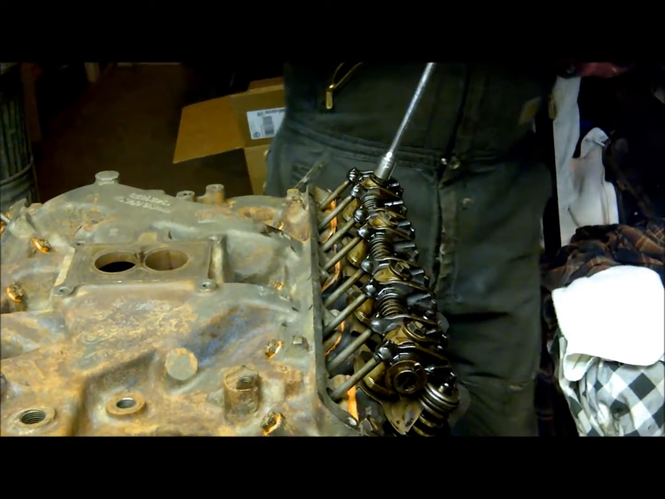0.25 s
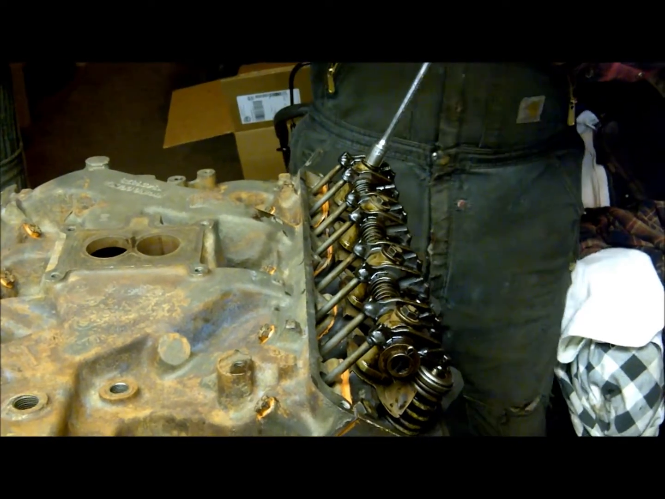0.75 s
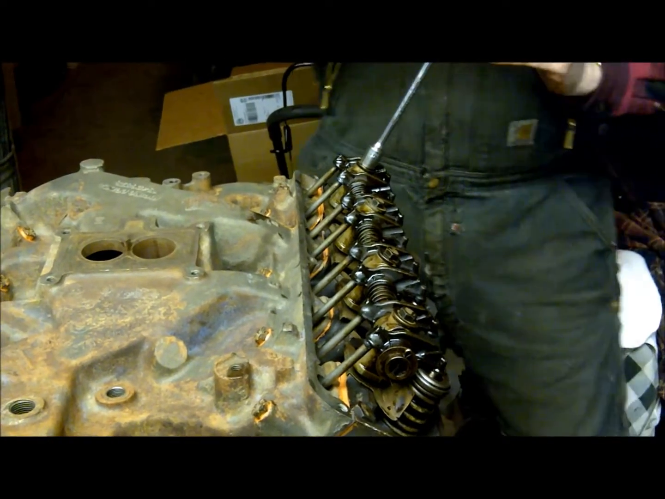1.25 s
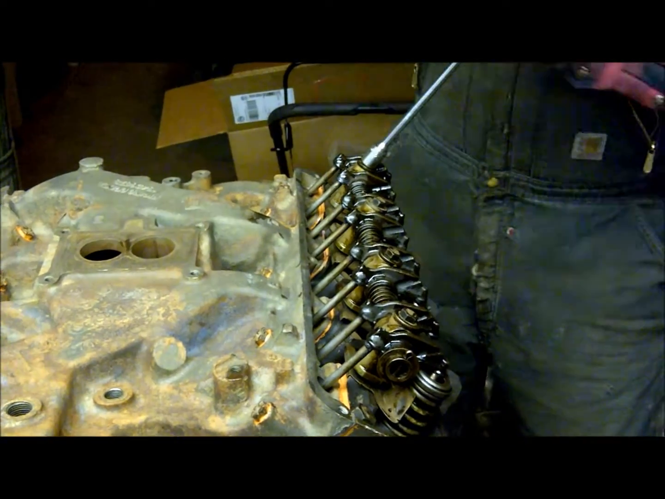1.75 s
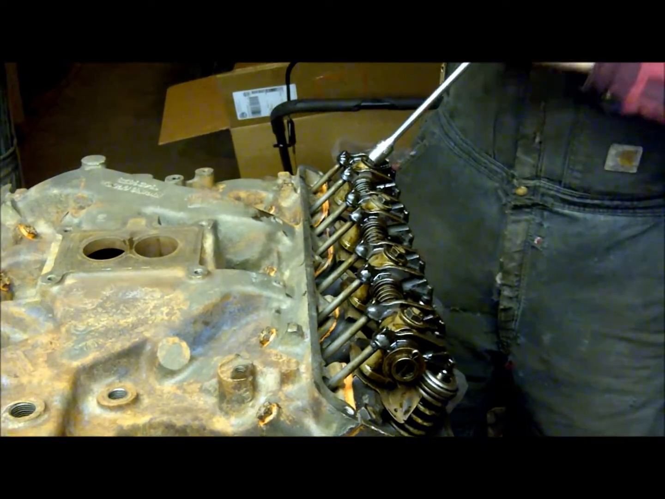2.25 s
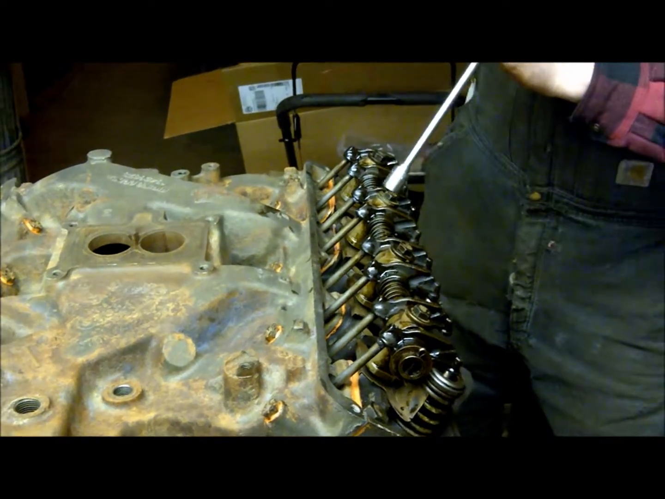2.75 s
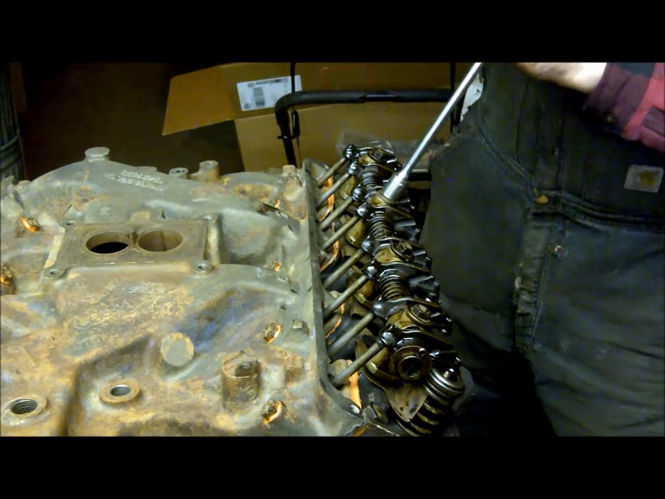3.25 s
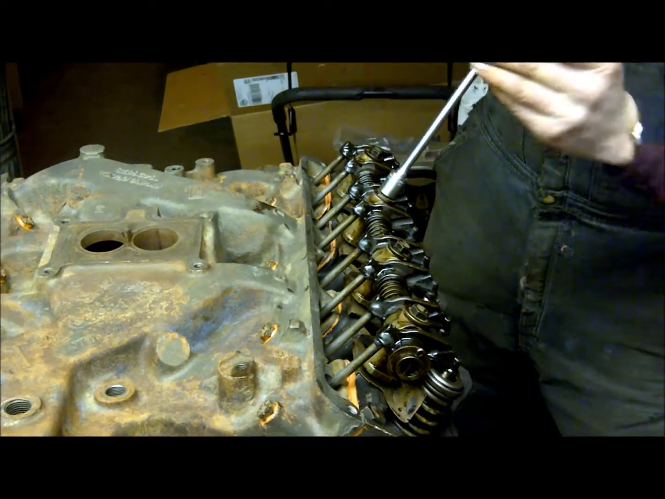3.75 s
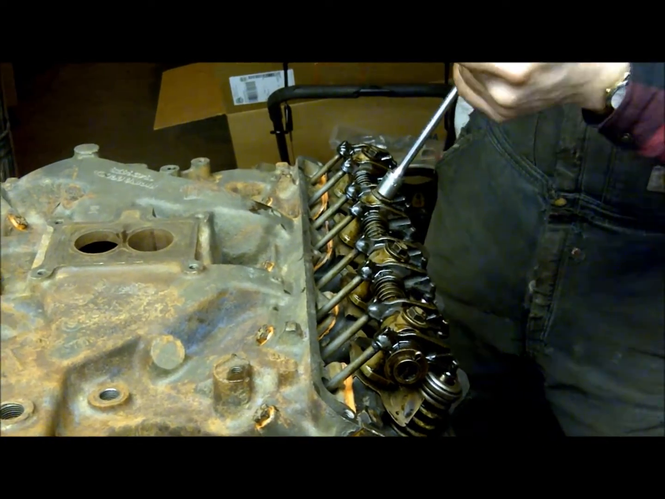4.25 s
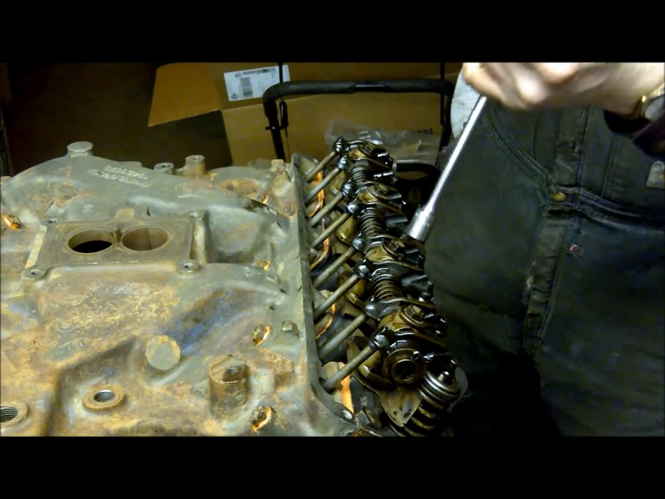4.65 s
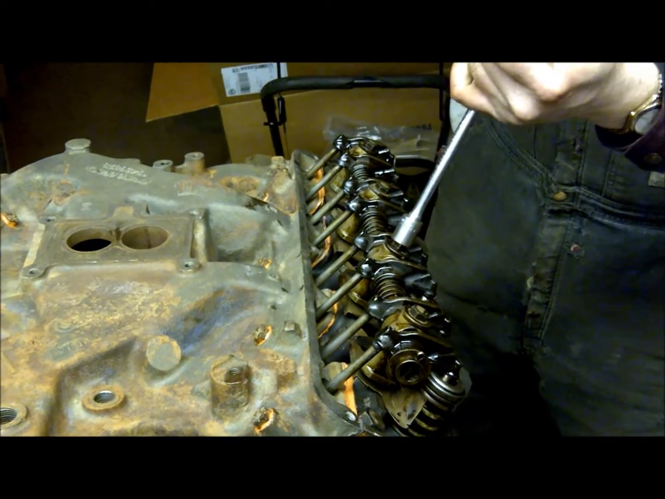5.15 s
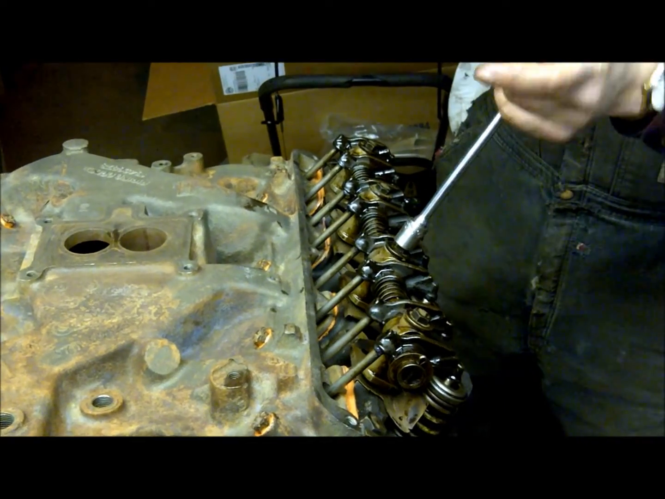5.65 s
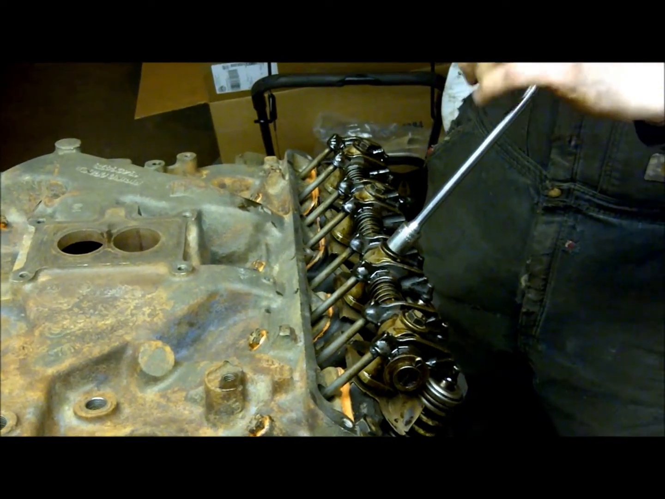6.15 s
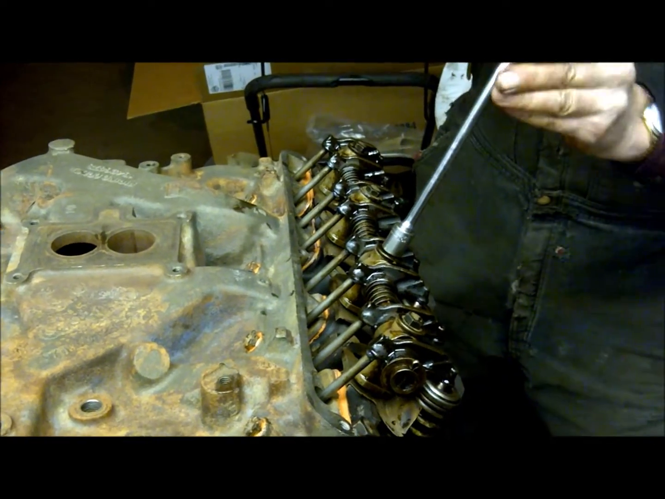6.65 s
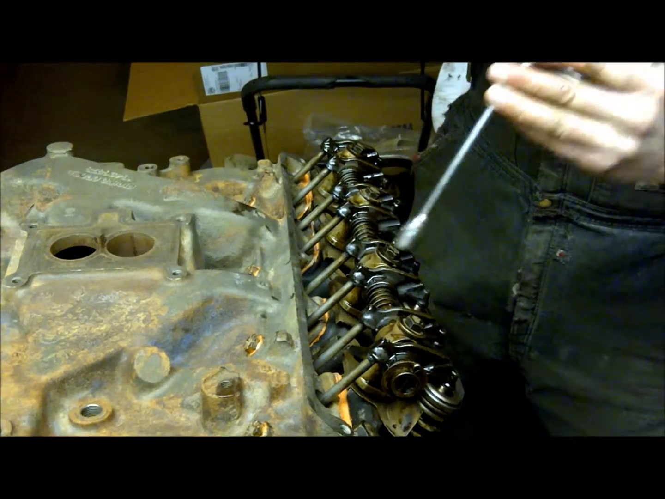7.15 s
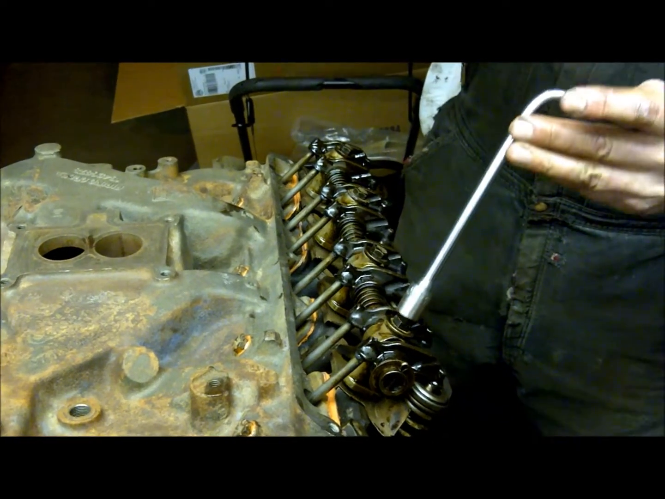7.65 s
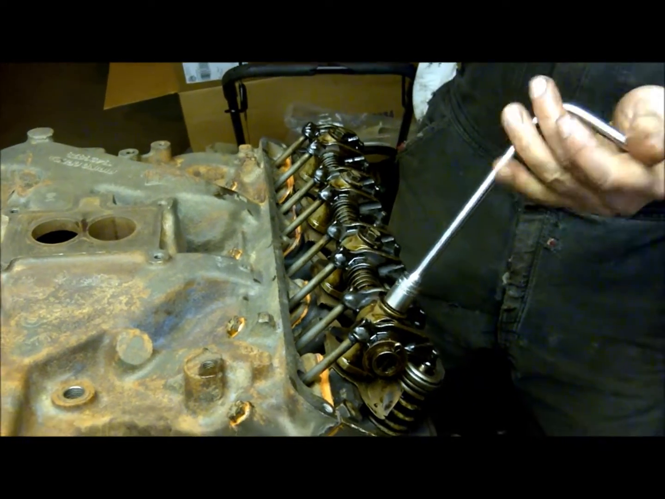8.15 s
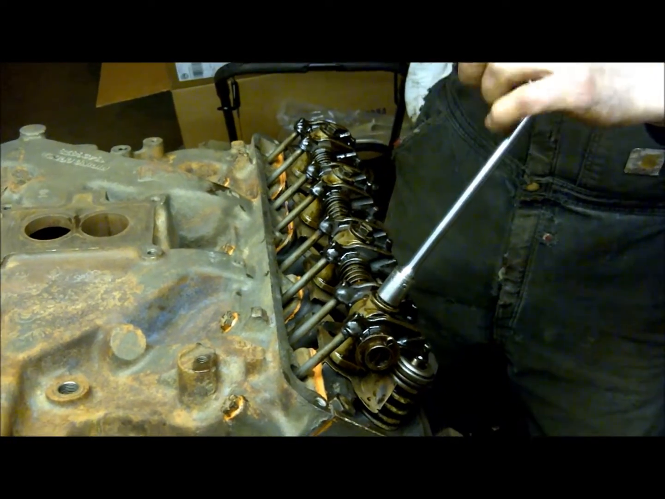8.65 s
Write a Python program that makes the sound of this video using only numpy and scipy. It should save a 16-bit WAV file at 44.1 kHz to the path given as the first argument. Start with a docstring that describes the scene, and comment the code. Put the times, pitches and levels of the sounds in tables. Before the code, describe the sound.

In a small, reflective garage, a steady low electrical hum with wavering fan tones and a soft rush of air runs throughout. A metal socket clicks lightly on engine bolts at once, with heavy canvas overalls swishing and dull body knocks. Sparser clinks follow, with faint hand-slides along the shaft. A sharp loud clank lands around the middle, then light ticks continue. Close microphone, slightly hissy.

```python
"""A long socket wrench turns one engine bolt after another in a small garage.
Mains hum, fan tones and a soft rush of air run underneath from start to end.
Small clicks of the steel socket start at once, with canvas overalls swishing and a few dull knocks.
Then come scattered clinks, fewer swishes and faint hisses of a hand sliding along the wrench's shaft;
the loudest clank is at 6 s. Steel rings as damped modes in noise, rubbing is grains, the room reflects."""
import sys
import numpy as np
from scipy import signal
from scipy.fft import rfft, irfft, next_fast_len
from scipy.io import wavfile

SR = 44100
rng = np.random.default_rng(int(sys.argv[2]) if len(sys.argv) > 2 else 0)


def pcm_store(signal):
    """Save signal as 16-bit PCM."""
    levels = np.round(np.clip(np.atleast_2d(signal), -1, 1) * 32767)
    wavfile.write(sys.argv[1], SR, levels.astype(np.int16).T)


N = 392469
TIME = np.arange(N) / SR  # s

# rise and fall of the fan's whine, which its rush follows a little; only the shape about
# the mean counts: (t/s, level/dB)
FAN_SWELL = [(0, -64.5), (1.4, -61.5), (2.7, -66), (3, -59), (4.9, -68), (5.4, -69), (6.55, -60.5),
             (6.9, -65.5), (8, -66.5), (8.9, -69)]


def gain_of(db):
    """Turns decibels into an amplitude factor."""
    return 10 ** (np.asarray(db) / 20)


def evened(x):
    """Scales a sound to rms 1."""
    return x / np.sqrt(np.mean(x ** 2) + 1e-20)


def read(points, hz):
    """Reads a table between its points, along a log-frequency axis."""
    f, value = np.transpose(points)
    return np.interp(np.log(hz + 1), np.log(f + 1), value)


def add(mix, s, sound):
    """Mixes a sound in, starting at s seconds."""
    part = mix[max(round(s * SR), 0):][:len(sound)]
    part += sound[:len(part)]


def coloured(x, points, size=4096):
    """Filters with a (f/Hz, level/dB) spectrum; the minimum-phase filter never sounds ahead of its input."""
    hz = abs(np.fft.fftfreq(size, 1 / SR))
    log_gain = np.log(gain_of(read(points, hz)))
    spectrum = np.exp(np.conj(signal.hilbert(log_gain)))
    taps = np.fft.ifft(spectrum).real[:size // 2]
    return signal.oaconvolve(x, taps)[:len(x)]


def band_db(x, lo, hi):
    """Finds the mean power between two frequencies, in dB."""
    hz = np.fft.rfftfreq(len(x), 1 / SR)
    in_band = (hz >= lo) & (hz < hi)
    return 10 * np.log10(2 * np.sum(abs(rfft(x)[in_band]) ** 2) / len(x) ** 2 + 1e-20)


def narrow_noise(hz, width):
    """Noise of rms 1 around one frequency, width in Hz at half amplitude; at 0 Hz, a slow drift."""
    size = next_fast_len(N)
    f = np.fft.rfftfreq(size, 1 / SR)
    resonance = 1 / (1 + ((f - hz) / width * 2) ** 2)
    return evened(irfft(rfft(rng.standard_normal(size)) * resonance, size)[:N])


def tone(hz, db, drift):
    """A sine of the given rms level whose phase drifts (radians)."""
    return gain_of(db) * np.sqrt(2) * np.sin(2 * np.pi * (hz * TIME + rng.random()) + drift)


def swell(points):
    """A level curve in dB about its own mean."""
    db = np.interp(TIME, *np.transpose(points))
    return db - db.mean()


def air(level_db=-53, hiss_db=-64, rush_share=0.29):
    """The fan's soft rush of filtered noise, which drifts in level, over a thin even hiss."""
    # colour of the moving air: (f/Hz, level per Hz/dB)
    rush_colour = [(15, -14), (28, -0.5), (48, 1), (75, -4), (130, -2.5), (280, -5), (450, -9), (650, -6.5),
                   (1000, -7), (1400, -9), (2200, -12), (3200, -15), (5000, -24.5), (12000, -22)]
    # colour of the hiss: (f/Hz, level per Hz/dB)
    hiss_colour = [(1000, -29), (5000, 10), (8000, 10), (11000, 4.5), (15500, -11)]
    rush = evened(coloured(rng.standard_normal(N), rush_colour))
    hiss = evened(coloured(rng.standard_normal(N), hiss_colour))
    rush_db = level_db + rush_share * swell(FAN_SWELL)  # rush_share: dB for each dB of the table
    return gain_of(rush_db) * rush + gain_of(hiss_db) * hiss


def whine(hz=841, width=11, level_db=-67, depth=1.2):
    """A thin fan tone, made of narrow noise, that comes and goes."""
    return gain_of(level_db + depth * swell(FAN_SWELL)) * narrow_noise(hz, width)


def hum_and_fan_tones(waver=0.059, fan_db=-1.5, flutter_db=1.3, flutter_hz=4):
    """Mains harmonics, of which the strongest swells and sinks, and fuzzier fan tones that follow it by half."""
    # mains harmonics: (f/Hz, level/dB), the strongest before its swell
    harmonics = [(120, -59), (240, -53.5), (360, -64.5), (480, -64), (600, -73), (720, -77), (1200, -69.5)]
    # fan and housing tones: (f/Hz, width/Hz, level/dB), before fan_db and the swell
    fan_tones = [(121, 42, -67.5), (170, 13, -64.5), (237, 114, -60), (326.5, 7.4, -64.5),
                 (340.7, 9.5, -62.5), (386.1, 14.4, -60), (421.5, 7.7, -65.5), (449.7, 21, -59.5),
                 (482, 42, -68), (554, 12, -66.5), (835, 74, -65), (1241, 65, -67.5), (1468, 52, -68.5)]
    # slow swell of the strongest harmonic; only the shape about the mean counts: (t/s, level/dB)
    hum_swell = [(0, -53), (1.5, -49.5), (2, -56.5), (2.6, -52), (4.35, -49), (4.85, -54.5), (6.1, -56.5),
                 (7.35, -50.5), (8.35, -52), (8.9, -57)]
    swell_db = swell(hum_swell) + flutter_db * narrow_noise(0, flutter_hz)
    drift = waver * narrow_noise(0, 2.1)  # radians
    strongest = max(db for hz, db in harmonics)
    mains = sum(tone(hz, db + swell_db * (db == strongest), drift) for hz, db in harmonics)
    fan = sum(gain_of(db) * narrow_noise(hz, width) for hz, width, db in fan_tones)
    fan = fan + tone(484, -58.5, 1.5 * narrow_noise(0, 1.2))  # the blades' tone
    return mains + gain_of(fan_db + swell_db / 2) * fan


def garage(x, wet_db=-8.0):
    """The room's answer: sparse reflections that build up quickly, each band dying at its own speed."""
    # time for the reflections to fall by 60 dB: (f/Hz, t60/s)
    fall_times = [(200, 0.83), (1500, 0.51), (4000, 0.51), (8000, 0.49), (11000, 0.39), (15000, 0.7)]
    # colour of the reflections: (f/Hz, level/dB)
    wall_colour = [(200, 4.5), (1500, 8), (2300, 2), (3400, 0), (4500, -3), (8000, -3), (11000, 0.5),
                   (13000, -7)]
    taps = rng.choice([-1., 1.], SR) * (rng.random(SR) < 5000 / SR)  # about 5000 a second
    hz, t, bands = signal.stft(taps, SR, nperseg=256)
    fading = bands * gain_of(-60 * t / read(fall_times, hz)[:, None])
    tail = signal.istft(fading, SR, nperseg=256)[1]
    tail *= np.clip((np.arange(len(tail)) / SR - .004) / 0.00088, 0, 1)  # silent for the first 4 ms
    tail = coloured(tail / np.linalg.norm(tail), wall_colour)
    return gain_of(wet_db) * signal.oaconvolve(x, tail)[:N]


def overalls_and_sliding_hand(level_db=-1, grain_db=1.5, snag_db=1.13):
    """Rubbing surfaces slip over each other: dense tiny grains under each rub of canvas or of the hand."""
    # strokes of canvas on canvas; the faint, treble-heavy ones (3.777, 4.024, 6.726 and 8.563 s)
    # are a hand sliding along the wrench's shaft; before level_db:
    # (middle t/s, half length/s, level/dB, treble against it/dB)
    rubs = [(0.101, 0.015, -48, -1), (0.3, 0.061, -52.5, 1), (0.36, 0.07, -47, -9), (0.78, 0.019, -51, -7),
            (0.925, 0.059, -48, -6.5), (1.085, 0.097, -56, -3), (1.178, 0.035, -49.5, -5.5),
            (1.369, 0.016, -43, 1.5), (1.418, 0.022, -52.5, -7), (1.87, 0.14, -49, -5.5),
            (3.044, 0.11, -56.5, -7), (3.572, 0.093, -60, -7), (3.777, 0.031, -72, 14.5),
            (4.024, 0.076, -64, 5.5), (6.726, 0.044, -69, 11), (8.563, 0.47, -68.5, 6)]
    # colour of the rubbing: (f/Hz, level/dB)
    rub_colour = [(400, -4), (1200, 1), (2200, 3.5), (2800, 5), (3300, 1), (4100, 3.5), (5200, -1),
                  (6500, -2.5), (8200, 1.5), (10000, -5.5), (12000, -11), (15500, -17)]
    grain_levels = grain_db * np.minimum(rng.exponential(1, N), 4)
    slips = rng.standard_normal(N) * (rng.random(N) < 9000 / SR) * gain_of(grain_levels)
    rough = coloured(slips, rub_colour) * gain_of(snag_db * narrow_noise(0, 73))  # snags and lets go
    body = signal.sosfilt(signal.butter(4, 6000, fs=SR, output="sos"), rough)
    fizz = signal.sosfilt(signal.butter(4, 6000, "high", fs=SR, output="sos"), rough)
    # bring both parts to 0 dB in their own band, judged over the first second
    body = body / gain_of(band_db(body[:SR], 2000, 6000))
    fizz = fizz / gain_of(band_db(fizz[:SR], 6000, 11000))
    out = np.zeros(N)
    for s, half, db, treble_db in rubs:
        at = abs(TIME - s) < 3 * half
        speed = np.exp(-((TIME[at] - s) / half) ** 2)
        out[at] += gain_of(db) * speed * (body[at] + gain_of(treble_db) * fizz[at])
    return gain_of(level_db) * out


def thud(hz, decay, push=0.95, size=16384):
    """A heavily damped thud: one hard push, then a broad shudder of noise around its pitch."""
    t = np.arange(size) / SR
    colour = [(hz / 4, -11), (hz / 0.99, -1), (hz * 1.3, 0), (hz * 1.47, -4), (hz * 2, -15), (hz * 10, -42)]
    shudder = evened(coloured(rng.standard_normal(size), colour))
    blow = push * np.sin(2 * np.pi * hz * t) * np.exp(-t * hz / 5.3)
    return blow + shudder * np.exp(-t / decay)


def knocks(stand_hz=285, stand_decay_s=0.13, stand_db=-19):
    """Each knock thuds at its own pitch and sets the engine stand booming, stand_db against it."""
    # dull knocks of feet and body against the floor and the engine stand:
    # (t/s, level/dB, pitch f/Hz, decay/s)
    blows = [(0.061, -33.5, 285, 0.015), (0.838, -42, 350, .012), (0.931, -47.5, 215, 0.012),
             (1.123, -42.5, 108, 0.027), (1.351, -28, 1310, 0.0062), (6.021, -44, 414, 0.068)]
    out = np.zeros(N)
    for s, db, hz, decay in blows:
        boom = gain_of(stand_db) * thud(stand_hz, stand_decay_s)
        add(out, s, gain_of(db) * (thud(hz, decay) + boom))
    return out


def contact(low_hz, chatter, ring_db=-2, low_db=0, high_db=3, part_t60=0.027, bounce=0.41,
            glance=0.62, glance_s=0.012, snap=1.5, size=2048):
    """The socket chatters: modes ring inside a dense clatter, which glances off the engine's faces."""
    # modes of the socket, its shaft and the bolt, damped by the hand: (f/Hz, level/dB, t60/s)
    steel_modes = [(1536, -9, .04), (2060, 0.5, 0.031), (2480, -6, 0.024), (2930, -0.5, 0.031),
                   (3205, -6.5, 0.075), (3780, -9, 0.034), (4600, -15, 0.036), (4800, -11, .035),
                   (5470, -1, 0.049), (6200, -2, 0.015), (7430, -15, 0.015), (7620, 1, 0.049),
                   (8030, -19, 0.017), (9000, -19, 0.018), (9200, 3.5, 0.021), (9940, 4.5, 0.043),
                   (10230, -1, 0.027), (10500, -13, 0.035), (10550, 3, 0.029), (12600, -18, .012)]
    # the dense clatter of a contact: (f/Hz, level/dB)
    clatter_colour = [(150, -30), (700, -6), (1300, -2), (2000, 1), (2650, -0.5), (3700, 1), (4500, 2),
                      (5900, 5), (6600, 1.5), (7700, 0.5), (8800, 3), (10300, -2.5), (11400, 0.5),
                      (12000, -2.5), (15500, -12)]
    t, chatter = np.arange(size) / SR, max(chatter, .0004)
    touches = bounce * rng.choice([-1., 1.], size) * (rng.random(size) < 3000 / SR) * np.exp(-t / chatter)
    touches[0] = 1
    high_hz = 7550 * (1 + 0.047 * rng.uniform(-0.71, 1))  # the socket's own ring, shifted by the grip
    modes = steel_modes + [(low_hz, low_db, part_t60), (high_hz, high_db, part_t60)]
    hz, db, t60 = np.transpose(modes)[:, :, None]
    grip, phase = rng.standard_normal((2, len(hz), 1))
    held_hz = hz * (1 + 0.0065 * grip)  # the grip detunes the ring a little
    ringing = gain_of(db - 60 * t / t60) * np.sin(2 * np.pi * (held_hz * t + phase))
    ring = signal.fftconvolve(touches, ringing.sum(0))[:size]
    rattle = rng.standard_normal(size) * (np.exp(-t / chatter) + glance * np.exp(-t / glance_s))
    clatter = coloured(snap * (t == 0) + rattle, clatter_colour, size)  # the first touch gets a snap
    return evened(clatter) + gain_of(ring_db) * evened(ring)


def wrench(low_slope=8, top_slope=6, low_cut=0.82, leak_db=27, strike_s=.012):
    """Steel contacts heard from one side, each between its part's lowest ring and its treble reach."""
    # steel on steel; a small part rings high, a hard contact reaches far into the treble:
    # (t/s, level over strike_s/dB, lowest ring of the part f/Hz, treble reach f/Hz, chatter time/s)
    clicks = [(0.062, -50.0, 1410, 4500.0, 0.0041), (0.1273, -42.5, 3300.0, 8000.0, 0.0016),
              (0.225, -50.5, 8000.0, 11000, 0.0019), (0.2494, -47, 3250, 5000.0, 0.0016),
              (0.2713, -47.0, 7660, 10500.0, 0.002), (0.4306, -40.5, 3400, 4800.0, 0.0016),
              (0.454, -33.0, 3190, 6650, 0.0014), (0.5869, -29, 1660, 8000, 0.0015),
              (0.9385, -33.5, 1870, 6960, 0.0045), (1.15, -45, 2280, 5100.0, 0.0015),
              (1.39, -48, 8000.0, 14000.0, 0.002), (1.451, -41.5, 7800, 7500.0, 0.0016),
              (1.524, -53, 7800.0, 12000.0, 0.002), (1.535, -49.5, 8100, 8500.0, 0.0026),
              (2.38, -52.7, 3300.0, 9900, 0.002), (2.4787, -30, 3160, 13400.0, 0.00082),
              (2.984, -44, 3360, 4750, 0.003), (3.069, -40.5, 1870, 7000.0, 0.003),
              (3.25, -41.5, 3340.0, 4700.0, 0.0038), (3.2787, -26.5, 2180, 7500.0, 0.0038),
              (4.082, -52.5, 4760, 13000.0, 0.002), (4.51, -56.5, 2500.0, 5700.0, 0.002),
              (5.0479, -37, 3300, 6000, 0.0015), (5.2567, -56.0, 3380, 4440, 0.002),
              (5.32, -55, 2110, 4960, 0.0024), (6.0185, -14.5, 4390, 8200.0, 0.006),
              (6.02, -28.5, 1850.0, 2900.0, 0.004), (6.0236, -15, 7400.0, 14000.0, 0.0018),
              (6.23, -35.0, 4070, 12500.0, 0.0073), (6.4752, -41.5, 2410.0, 8300, 0.002),
              (6.484, -33, 2260, 6000.0, 0.0047), (6.5246, -41, 3080, 9100.0, 0.0027),
              (6.8806, -48.5, 4600, 6800, 0.0016), (7.2803, -51.5, 2060.0, 6060, 0.002),
              (7.3745, -42, 3060, 9900, 0.0018), (7.948, -46.5, 2760, 4550, 0.002),
              (7.9707, -31.5, 3660, 7000.0, 0.001), (8.0255, -42, 3560.0, 5430, 0.0014),
              (8.0387, -40.5, 2800, 5740, 0.005), (8.2301, -43, 1450.0, 4260, 0.0012),
              (8.294, -51.5, 1800.0, 4500.0, 0.002)]
    # how the hollow socket colours every contact: (f/Hz, level/dB)
    socket_colour = [(1100, 3.5), (1700, -1.5), (3100, -1.5), (3700, -2), (5700, -2.5), (6600, 2),
                     (7600, 4.5), (8800, 1.5), (10400, 0), (14000, 6)]
    out = np.zeros(N)
    hz = np.geomspace(300, 16000, 40)
    for s, db, low_hz, top_hz, chatter in clicks:
        # a part radiates little under low_cut times its lowest ring
        low_loss = 1 + (low_cut * low_hz / hz) ** low_slope
        top_loss = 1 + (hz / top_hz) ** top_slope
        # outside its range the engine block still radiates, leak_db weaker
        loss_db = np.minimum(10 * np.log10(low_loss * top_loss), leak_db)
        colour = list(zip(hz, read(socket_colour, hz) - loss_db))
        click = coloured(contact(low_hz, chatter), colour, size=1024)
        strength = np.sqrt(np.sum(click ** 2) / (strike_s * SR))
        add(out, s, gain_of(db) * click / strength)
    return out


def scene(count=3, knock_room_db=-5):
    """Wrench, knocks and rubbing in the room, over the hum; each wall hears the steel from another side."""
    thuds, rubbing = knocks(), overalls_and_sliding_hand()
    reflected = sum(garage(wrench()) for _ in range(count)) / np.sqrt(count)
    reflected = reflected + garage(rubbing + gain_of(knock_room_db) * thuds)  # the knocks are fairly dry
    background = hum_and_fan_tones() + whine() + air()
    return (wrench() + reflected + thuds + rubbing + background)[None]


def record(dry):
    """The recorder's overload, which flattens high peaks, and its upper band limit."""
    held = np.clip(dry, -.85, .85)
    low_pass = signal.firwin(401, 15450, window=("kaiser", 8), fs=SR)  # edge in Hz
    return signal.oaconvolve(held, low_pass[None], "same")


dry = scene()
out = record(dry)
pcm_store(out)
```